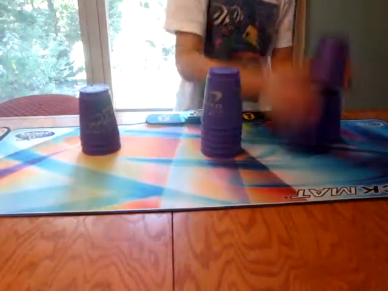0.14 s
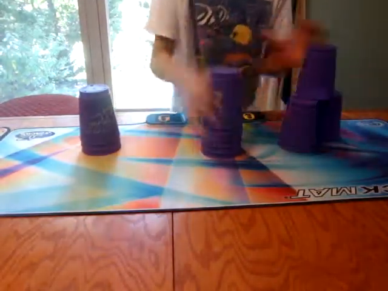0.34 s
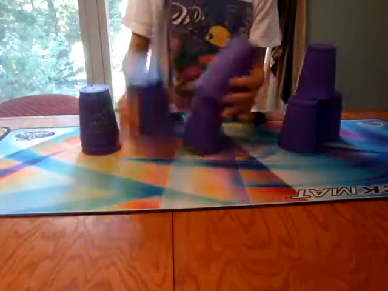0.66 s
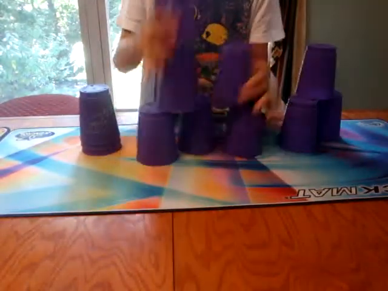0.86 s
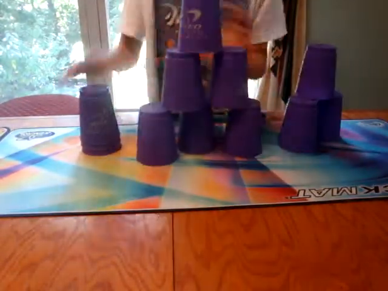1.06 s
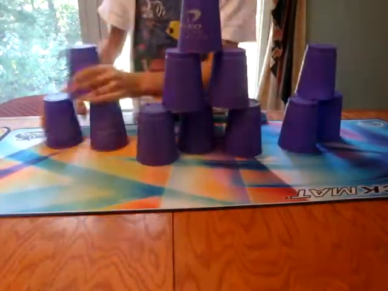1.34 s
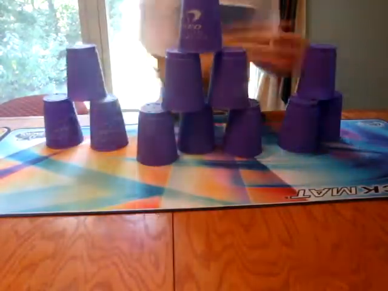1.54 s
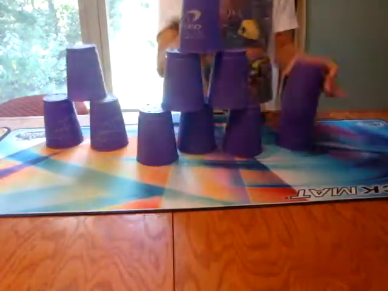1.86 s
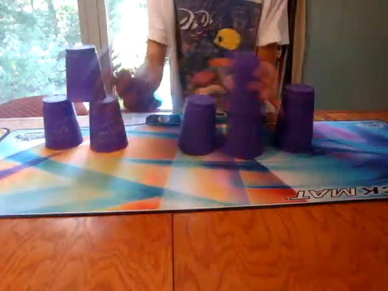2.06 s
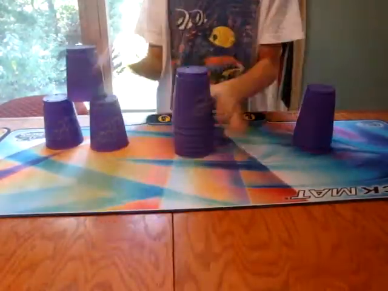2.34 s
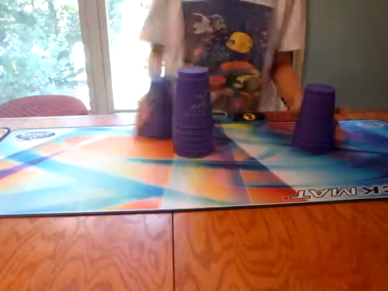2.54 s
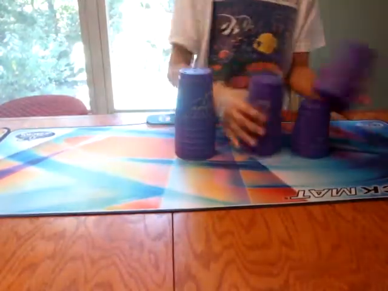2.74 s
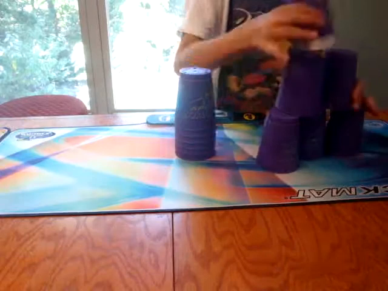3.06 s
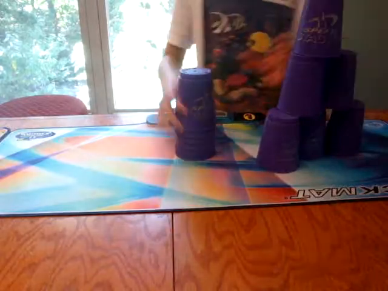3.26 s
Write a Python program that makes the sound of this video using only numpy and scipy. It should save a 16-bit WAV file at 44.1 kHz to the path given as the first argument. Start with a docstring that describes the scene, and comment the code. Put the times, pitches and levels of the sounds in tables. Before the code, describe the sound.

Plastic cups being speedily stacked on a table, with hollow knocks, clacks and brief scrapes.

```python
"""At a table in an echoing room, hard plastic cups are quickly stacked and unstacked on a mat.
Each contact gives a hollow knock, a clack of the cup wall and a sharp rim tick, then rattles briefly.
The first stack lands hard and shakes the table. Sliding cups scrape, and the air inside them hoots.
The room rings on, and a small recorder close by rounds off the loudest blows."""
import sys
import numpy as np
from scipy import signal
from scipy.fft import rfft, irfft
from scipy.io import wavfile
from scipy.ndimage import uniform_filter1d

SR = 44100
rng = np.random.default_rng(int(sys.argv[2]) if len(sys.argv) > 2 else 0)


def put_to_file(sound):
    """Save the sound as 16-bit audio at rate SR, in the file named by the first command-line argument."""
    columns = np.atleast_2d(sound).T  # one column per channel
    safe = np.clip(columns, -1, 1)
    whole_steps = np.round(safe * 32767)
    wavfile.write(sys.argv[1], SR, whole_steps.astype(np.int16))


N = 149940

# tone colour of the room noise and of brushing on the mat: f/Hz, level/dB
BACKGROUND_SPECTRUM = [(130, -1), (700, 6.5), (1600, -3), (10000, -21)]
# cups hitting something: t/s, knock f/Hz, knock level/dB, clack level/dB, tick level/dB
CUP_CONTACTS = [(0.035, 553, -23, -62, -54), (0.218, 767, -4, -12, -35), (0.233, 606, -7, -8, -53),
                (0.25, 939, -2, -20.5, -14), (0.269, 910, -13.5, -5, -23.5),
                (0.539, 828, -17.5, -15, -38.5), (0.547, 1150, -21.5, -23, -36),
                (0.657, 1195, -60, -24.5, -32.5), (0.688, 615, -12.5, -11, -32),
                (0.694, 1085, -31, -10.5, -24.5), (0.706, 663, -14.5, -25, -45),
                (0.719, 806, -13, -20, -46), (0.741, 643, -15.5, -24, -36.5), (0.807, 554, -25.5, -30, -60),
                (0.825, 566, -21.5, -24, -28.5), (0.866, 1052, -12, -25, -36),
                (0.883, 996, -17, -18.5, -31), (0.913, 856, -8.5, -11.5, -22.5),
                (0.978, 1013, -10.5, -7.5, -20.5), (1.242, 1814, -21, -27.5, -33),
                (1.246, 1240, -24.5, -32, -55), (1.365, 811, -12.5, -13, -25.5),
                (1.385, 941, -8, -7.5, -17), (1.654, 774, -19.5, -21.5, -37.5),
                (1.677, 897, -20, -22, -39.5), (1.693, 792, -21, -17.5, -29.5),
                (1.791, 986, -19.5, -16.5, -24), (1.81, 945, -20.5, -26, -34),
                (1.827, 940, -28.5, -25, -33), (1.853, 964, -23, -18, -24.5), (1.881, 910, -25, -15.5, -31),
                (1.912, 990, -21, -17, -26.5), (1.926, 833, -17, -28.5, -39.5),
                (1.938, 910, -18.5, -18, -42), (1.947, 980, -24.5, -25, -21), (1.97, 802, -19.5, -7, -23.5),
                (1.984, 1730, -18.5, -20, -25.5), (2.004, 1636, -21, -19, -35),
                (2.028, 1351, -14, -12, -25.5), (2.103, 845, -26.5, -18.5, -32),
                (2.13, 893, -27.5, -20, -27.5), (2.153, 1815, -17, -23, -26),
                (2.16, 835, -16.5, -14.5, -37), (2.213, 960, -33.5, -22, -26.5),
                (2.225, 670, -23.5, -15, -35.5), (2.238, 880, -25, -9, -26.5),
                (2.303, 700, -26.5, -39, -28.5), (2.311, 825, -26.5, -11, -38),
                (2.381, 916, -25, -20.5, -58), (2.399, 940, -15.5, -30, -24.5),
                (2.438, 985, -26, -32, -35.5), (2.54, 846, -19.5, -7.5, -21.5),
                (2.576, 910, -34, -9, -22.5), (2.779, 577, -31, -32, -56), (2.841, 778, -19.5, -23, -32.5),
                (2.917, 608, -23.5, -24, -38), (2.964, 814, -19.5, -28, -33), (2.984, 1206, -21, -35, -64),
                (3.035, 864, -10.5, -9.5, -24), (3.099, 905, -9.5, -10, -23.5)]
# extra tones of the air in and between the cups: ratio to the knock pitch, level/dB
AIR_TONES = [(0.622, -6.5), (1.416, -13)]
# tone colour of the table's thud: f/Hz, level/dB
THUD_SPECTRUM = [(220, -20), (480, 9.5), (1300, 3.5), (3000, -62)]
# tone colour of the cup wall's clack: f/Hz, level/dB
CLACK_SPECTRUM = [(800, -12.5), (1400, 0.5), (2900, -3.5), (4200, -13), (8000, -34.5)]
# tone colour of the rim's tick: f/Hz, level/dB
TICK_SPECTRUM = [(1500, 5.5), (3000, 2), (5200, 9.5), (6800, 0), (10000, -20.5)]
# how the room rings, from bass to treble: f/Hz, time to fade by 60 dB/s, level/dB
ROOM_BANDS = [(248, 0.22, 10), (830, 0.44, 3.5), (5000, 0.47, -3)]
# air ringing in cups that slide or settle: t/s, hold time/s, f/Hz, level/dB
AIR_HOOTS = [(0.227, 0.017, 579.6, -9.5), (0.254, 0.11, 938, -12.5), (0.291, 0.042, 1269, -21.5),
             (.548, 0.0078, 1192, -23), (.868, 0.037, 1083, -16), (0.909, 0.034, 926, -17),
             (.99, 0.067, 984, -18), (.985, 0.033, 1279, -20.5), (3.04, 0.015, 815, -21.5),
             (3.101, 0.049, 982, -22)]
# cups scraping into or out of one another: t/s, length/s, level/dB
CUP_SCRAPES = [(.25, 0.017, -29.5), (1.369, 0.036, -25.5), (1.796, 0.28, -28.5), (2.142, .12, -31.5),
               (2.544, 0.056, -28.5)]
# tone colour of rims rubbing together: f/Hz, level/dB
RUB_SPECTRUM = [(2000, -24), (5000, -5), (9000, 0)]

# a T60 is the time a sound takes to fade by 60 dB
BRUSH_DB, BRUSH_HOLD_S, BRUSH_T60_S, ROOM_NOISE_DB = -36, 0.487, 0.54, -49
CUP_HZ, HIT_SAMPLES, HIT_RISE_S = 888, 2048, 0.0004  # CUP_HZ: typical knock pitch of one cup
KNOCK_DB, KNOCK_T60_S = 9.5, 0.026
THUD_DB, THUD_T60_S = -7.5, 0.037
CLACK_DB, CLACK_T60_S, WALL_RATIO = -1, 0.016, 2.65  # the ratio is wall pitch over knock pitch
TICK_DB, TICK_T60_S = 7, 0.021
RIM_LOW_HZ, RIM_HIGH_HZ, RIM_DB = 4000, 9800, -4
WALL_SPREAD, BOUNCE_SPREAD, SLIP_SPREAD = 0.09, 0.12, 0.311  # random pitch change: 0.1 is about 10 %
BOUNCE_DB, BOUNCE_GAP_S, BOUNCE_DROP_DB = -7, 0.005, 2.5
ROOM_DB, ROOM_GAP_S, ROOM_BUILD_S = -10.5, 0.0087, 0.0038
THUMP_START_S, THUMP_HZ, THUMP_DB, THUMP_T60_S = 0.219, 161, -13, 0.11
HOOT_RISE_S, HOOT_T60_S, HOOT_FLUTTER_DB, HOOT_WOBBLE, HOOT_ROOM_DB = 0.00087, 0.15, 3, 0.011, -9
RUB_DB, RUB_T60_S, SLIP_SCATTER_DB = -14, 0.0037, 3.5
PEAK_LIMIT, LOW_CUT_HZ, HIGH_CUT_HZ = 0.52, 139.5, 10150


def undb(db):
    """Turn decibels into a number to multiply by."""
    return 10 ** (np.asarray(db) / 20)


def unit(x):
    """Scale x so that its average strength (rms) is 1."""
    return x / np.sqrt(np.mean(x ** 2))


def fade(t, t60):
    """Stay at 1 until t = 0, then fall by 60 dB every t60 seconds."""
    return np.exp(-np.log(1000) * np.maximum(t, 0) / t60)


def noise(points, size):
    """Noise of strength 1, shaped by (f/Hz, level/dB) points and falling away below the first."""
    hz, db = np.array(points, float).T
    f = np.maximum(np.fft.rfftfreq(size, 1 / SR), 1)
    gain = undb(np.interp(np.log(f), np.log(hz), db)) * np.minimum(f / hz[0], 1) ** 2
    return unit(irfft(rfft(rng.standard_normal(size)) * gain, size))


def drift(span_s):
    """A smooth random wiggle of strength 1; a longer span makes it slower."""
    width = max(int(span_s * SR), 2)
    return unit(uniform_filter1d(uniform_filter1d(rng.standard_normal(N), width), width))


def add(out, start_s, x):
    """Mix x into out at a given time."""
    i = max(int(start_s * SR), 0)
    out[i:i + len(x)] += x[:max(len(out) - i, 0)]


def burst(x, t, t60):
    """Let x die away, with the energy of a fade that starts at strength 1."""
    decay = fade(t, t60)
    return unit(x * decay) * np.sqrt(np.mean(decay ** 2))


def brushing():
    """Hands and cups brush the mat at the start: a soft rustle that holds, then fades."""
    t = np.arange(N) / SR
    level = undb(BRUSH_DB + 3.3 * drift(0.0015)) * fade(t - BRUSH_HOLD_S, BRUSH_T60_S)
    return level * noise(BACKGROUND_SPECTRUM, N)


def room_noise():
    """Quiet noise fills the room, and its level flickers."""
    return undb(ROOM_NOISE_DB + 6.1 * drift(0.0033)) * noise(BACKGROUND_SPECTRUM, N)


def contact(hz, knock_db, clack_db, tick_db):
    """One blow: the air in the cup knocks, the table thuds, the wall clacks and the rim ticks."""
    t = np.arange(HIT_SAMPLES) / SR
    rise = 1 - np.exp(-t / HIT_RISE_S)
    chance = rng.standard_normal((len(AIR_TONES), 2))
    extra_tones = sum(undb(db) * size * np.sin(2 * np.pi * hz * ratio * (1 + detune / 20) * t)
                      for (ratio, db), (size, detune) in zip(AIR_TONES, chance))
    air = undb(KNOCK_DB) * (np.sin(2 * np.pi * hz * t) + extra_tones) * fade(t, KNOCK_T60_S)
    knock = np.gradient(rise * air) * SR / (2 * np.pi * hz)  # a small cup gives off little bass
    weight = (CUP_HZ / hz) ** 2  # low knocks are landings, so they thud more
    thud = undb(THUD_DB) * weight * burst(noise(THUD_SPECTRUM, HIT_SAMPLES), t, THUD_T60_S)
    wall_hz = hz * WALL_RATIO * np.exp(WALL_SPREAD * rng.standard_normal())
    wall = np.sin(2 * np.pi * wall_hz * t) + noise(CLACK_SPECTRUM, HIT_SAMPLES)
    clack = undb(CLACK_DB + clack_db) * burst(rise * wall, t, CLACK_T60_S)
    rim_pitches = rng.uniform(RIM_LOW_HZ, RIM_HIGH_HZ, 2)
    rim = undb(RIM_DB) * sum(np.sin(2 * np.pi * pitch * t) for pitch in rim_pitches)
    tick = undb(TICK_DB + tick_db) * burst(rim + noise(TICK_SPECTRUM, HIT_SAMPLES), t, TICK_T60_S)
    return undb(knock_db) * (knock + rise * thud) + clack + tick


def rattling_cups(bounces=3):
    """The cups hit, then bounce a few times at uneven gaps, more weakly each time."""
    out = np.zeros(N)
    for start, hz, *levels in CUP_CONTACTS:
        add(out, start, contact(hz, *levels))
        delays = np.cumsum(rng.uniform(0.5, 2, bounces)) * BOUNCE_GAP_S
        pitches = hz * np.exp(BOUNCE_SPREAD * rng.standard_normal(bounces))
        for k, (delay, pitch) in enumerate(zip(delays, pitches)):
            add(out, start + delay, undb(BOUNCE_DB - k * BOUNCE_DROP_DB) * contact(pitch, *levels))
    return out


def room_ring(x):
    """The room's echoes blur into a ring that builds after a short gap; the bass dies first."""
    t = np.arange(SR) / SR
    log_f = np.log(np.maximum(np.fft.rfftfreq(SR, 1 / SR), 1))
    centres = np.log([hz for hz, _, _ in ROOM_BANDS])
    white = rfft(rng.standard_normal(SR))
    tail = np.zeros(SR)
    for share, (_, t60, db) in zip(np.eye(len(ROOM_BANDS)), ROOM_BANDS):
        band = irfft(white * np.interp(log_f, centres, share), SR)
        tail += band * fade(t, t60) * undb(db)
    tail *= 1 - np.exp(-np.maximum(t - ROOM_GAP_S, 0) / ROOM_BUILD_S)
    return undb(ROOM_DB) * signal.fftconvolve(x, unit(tail) / np.sqrt(SR))[:N]


def table_thump():
    """The first stack lands hard, and the table top gives a low boom."""
    t, out = np.arange(SR // 2) / SR, np.zeros(N)
    octave = signal.butter(1, [THUMP_HZ / np.sqrt(2), THUMP_HZ * np.sqrt(2)], "band", fs=SR)
    boom = signal.lfilter(*octave, rng.standard_normal(len(t)))
    add(out, THUMP_START_S, undb(THUMP_DB) * burst(boom, t, THUMP_T60_S))
    return out


def hoots():
    """The air in a sliding cup rings: its tone swells, wavers and dies away."""
    t, out = np.arange(N) / SR, np.zeros(N)
    for start, hold, hz, db in AIR_HOOTS:
        swell = (1 - np.exp(-t / HOOT_RISE_S)) * fade(t - hold, HOOT_T60_S)
        level = undb(db + HOOT_FLUTTER_DB * drift(0.0017))
        pitch = hz * (1 + HOOT_WOBBLE * drift(0.0042))
        add(out, start, swell * level * np.sin(2 * np.pi * np.cumsum(pitch) / SR))
    return out


def scrapes(slips=20):
    """Sliding cups stick and slip: an uneven run of tiny blows, each with a short hiss of the rims."""
    t, out = np.arange(HIT_SAMPLES) / SR, np.zeros(N)
    for start, length, db in CUP_SCRAPES:
        times = start + length * (np.arange(slips) + rng.random(slips)) / slips
        for time, (shift, size) in zip(times, rng.standard_normal((slips, 2))):
            slip = contact(CUP_HZ * np.exp(SLIP_SPREAD * shift), 0, 0, tick_db=-np.inf)  # no tick
            hiss = undb(RUB_DB) * burst(noise(RUB_SPECTRUM, HIT_SAMPLES), t, RUB_T60_S)
            add(out, time, undb(db + SLIP_SCATTER_DB * size) * (slip + hiss))
    return out


def scene():
    """Mix the cups, the table and the room into one channel."""
    clatter = rattling_cups() + scrapes()
    air = hoots()
    thump = table_thump()
    ring = room_ring(clatter + undb(HOOT_ROOM_DB) * air)
    out = clatter + air + thump + ring + brushing() + room_noise()
    return out[None]


def record(dry):
    """The recorder rounds the loudest peaks, thins the bass and cuts the treble steeply."""
    rounded = dry / (1 + (dry / PEAK_LIMIT) ** 4) ** (1 / 4)
    thinned = signal.sosfilt(signal.butter(2, LOW_CUT_HZ, "high", fs=SR, output="sos"), rounded)
    return signal.sosfilt(signal.ellip(10, 0.2, 70, HIGH_CUT_HZ, fs=SR, output="sos"), thinned)


dry = scene()
out = record(dry)
put_to_file(out)
```